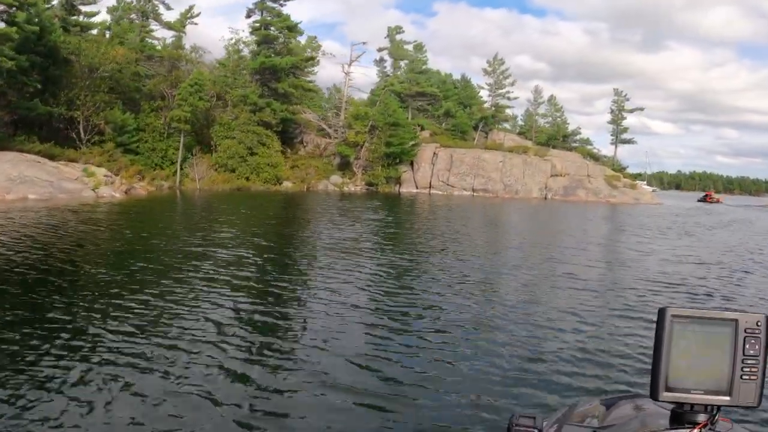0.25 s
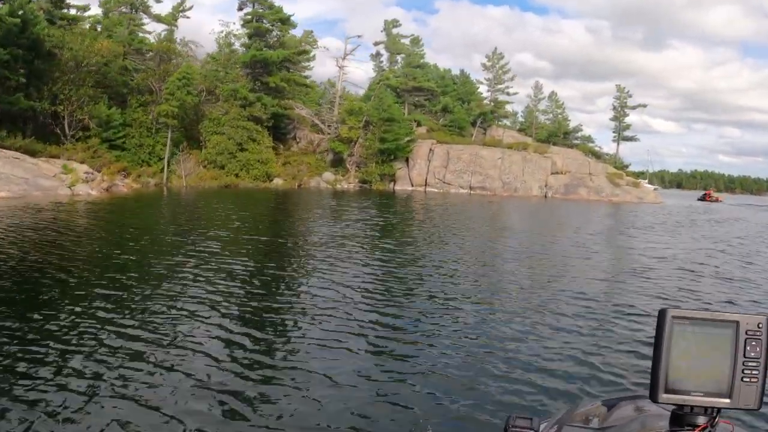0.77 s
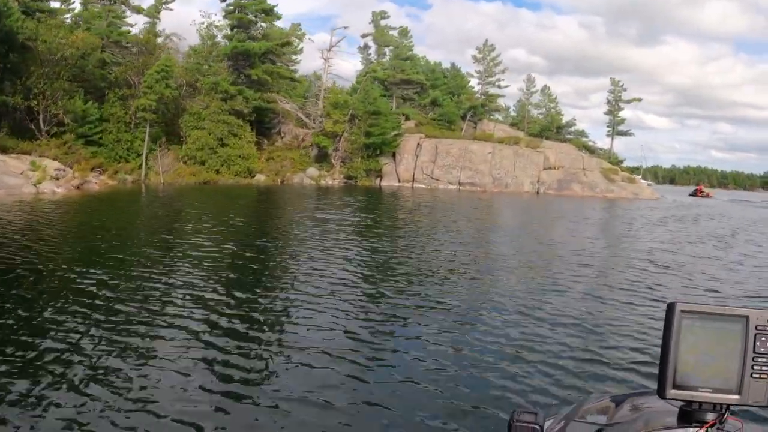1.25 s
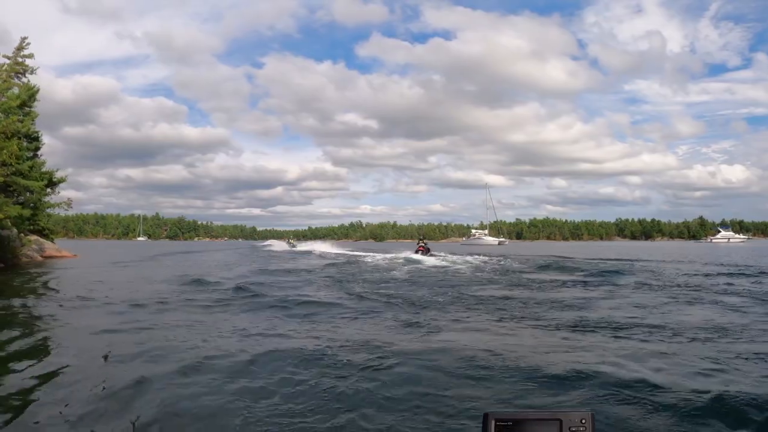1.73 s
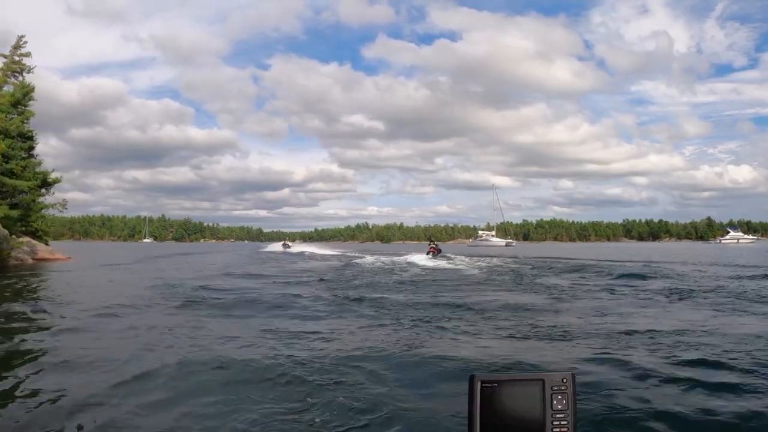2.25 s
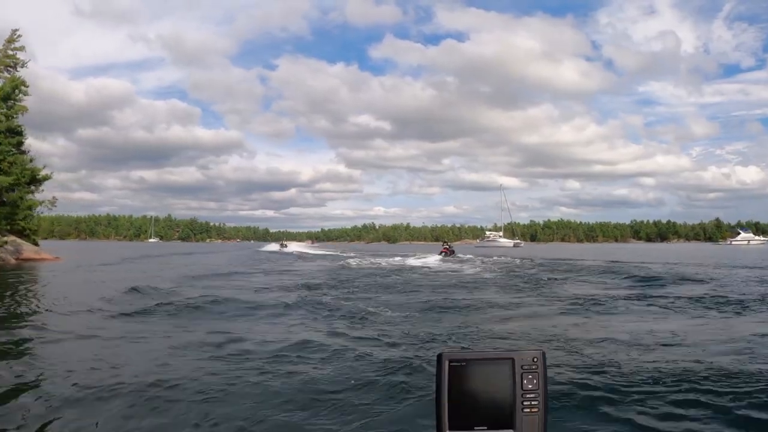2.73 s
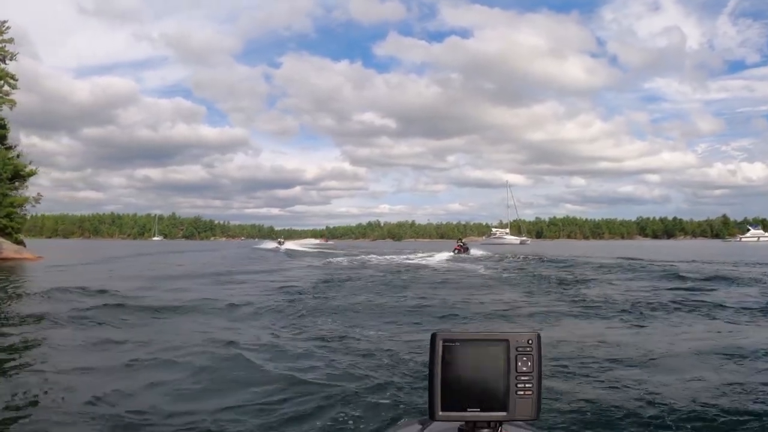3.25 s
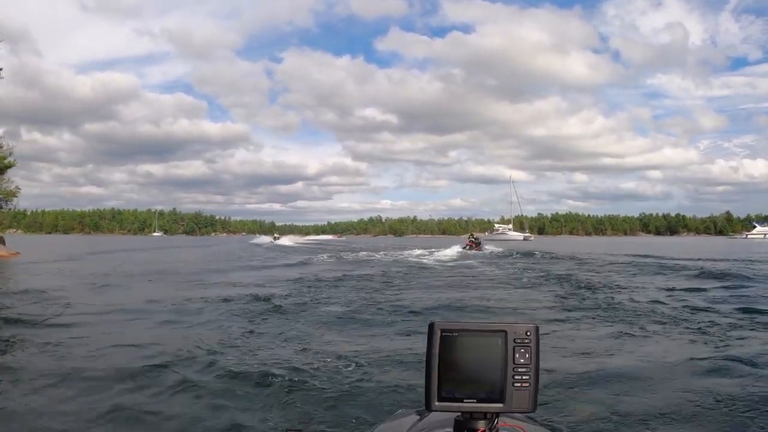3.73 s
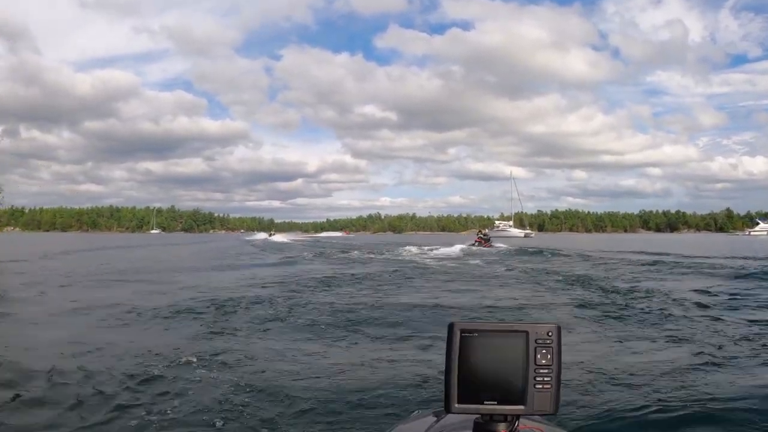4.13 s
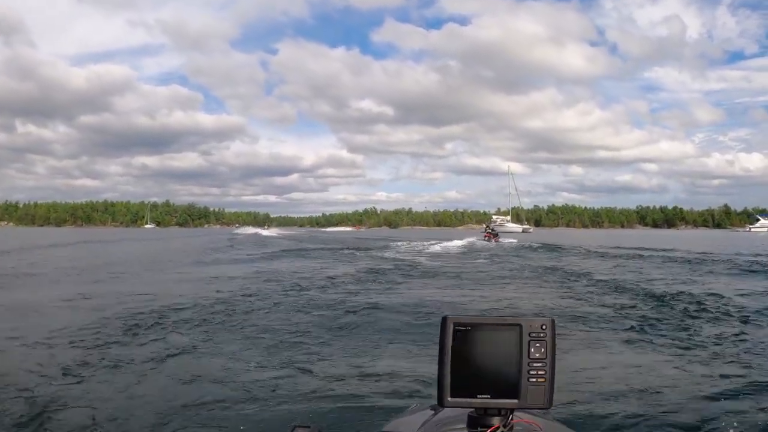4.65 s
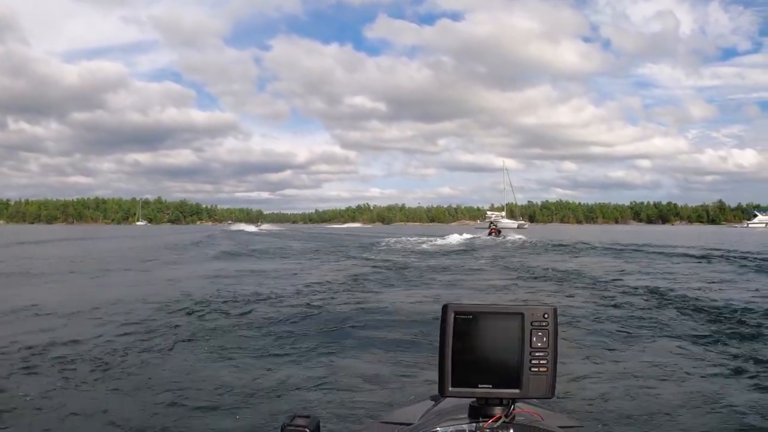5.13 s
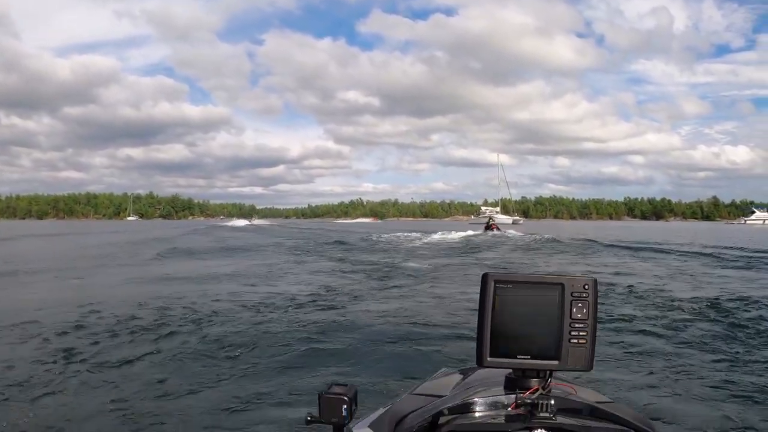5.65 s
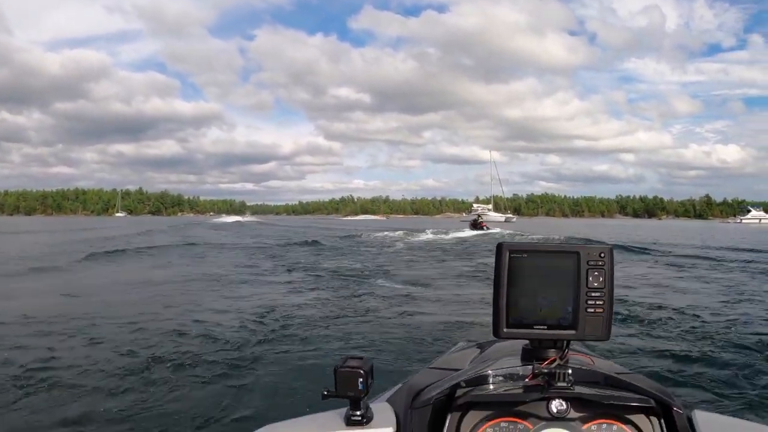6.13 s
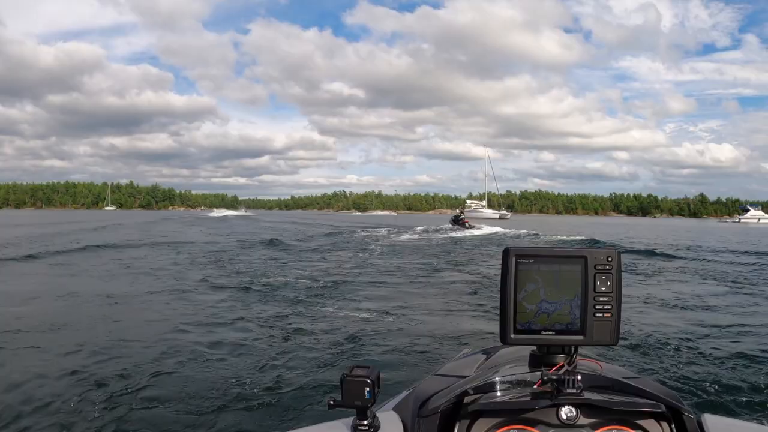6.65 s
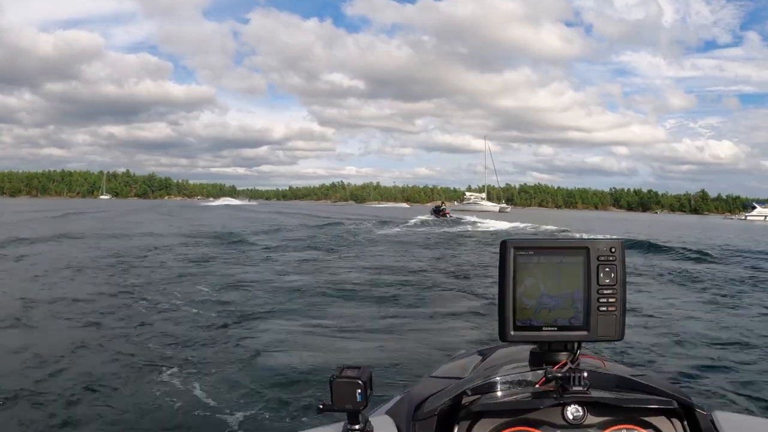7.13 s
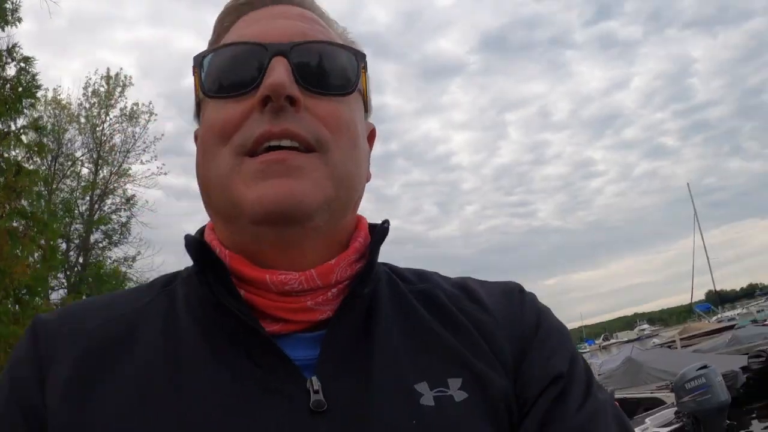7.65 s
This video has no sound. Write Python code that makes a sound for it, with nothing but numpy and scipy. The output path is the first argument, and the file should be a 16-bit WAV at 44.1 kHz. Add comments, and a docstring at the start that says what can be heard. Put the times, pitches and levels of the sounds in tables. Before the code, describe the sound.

An onboard microphone catches a watercraft's low idle hum, sharply replaced by the ride. The motor revs up, sags slightly through choppy swells, then climbs to a cleaner, higher drone as the hull planes. Bubbling exhaust, rushing wash, knocks and wet sheets of spray surround it, with a second craft's drone in front. Finally everything cuts to a deep gusty outdoor rumble and one short falling chirp.

```python
"""A personal watercraft heard from the seat: its three-cylinder engine idles, then pulls away and climbs onto the plane.
The engine is a stack of tones locked to its turning; a second craft drones ahead as one such tone.
Exhaust burble, wash, spray and foam are noise given a spectrum, with ringing bubbles in the spray and foam.
Two abrupt scene changes part the idle, the ride and a gusty rumble that fades in with one short chirp."""
import sys
import numpy as np
from scipy import signal
from scipy.fft import rfft, irfft
from scipy.io import wavfile

SR = 44100
rng = np.random.default_rng(int(sys.argv[2]) if len(sys.argv) > 2 else 0)


def dump_mix(stems):
    """Bounce the given channels to the path in sys.argv[1] as a 16-bit WAV at rate SR."""
    frames = np.atleast_2d(stems).T  # one column per channel
    limited = np.clip(frames, -1, 1)  # hard clip at full scale
    pcm = np.round(limited * 32767).astype(np.int16)
    wavfile.write(sys.argv[1], SR, pcm)


N = 347949
TIME = np.arange(N) / SR  # seconds
FIRST_CUT_S, SECOND_CUT_S = 1.371, 7.49  # the idle ends; the ride ends

# Water rushing along the hull, which also feeds the steady spray.
# Each row: time in seconds, level in dB before the wash's own small boost.
WASH_LEVEL = [(1.45, -53), (1.6, -50.5), (1.95, -46), (2.25, -44.5), (2.7, -45), (3.0, -42), (3.45, -39.5),
              (4.0, -39.5), (4.6, -40), (5.5, -40.5), (5.75, -42), (6.02, -47.5), (6.35, -52), (6.8, -52.5),
              (7.05, -52.5), (7.3, -46), (7.47, -46.5)]


def amp(db):
    """Turns decibels into a gain."""
    return 10 ** (np.asarray(db) / 20)


def unit(x):
    """Scales a sound to an rms of 1."""
    return x / np.sqrt(np.mean(x ** 2) + 1e-20)


def curve(rows):
    """Draws straight lines between the (time, value) rows, giving a value at every sample."""
    return np.interp(TIME, *np.transpose(rows))


def read(points, hz):
    """Reads a (frequency, value) table along a logarithmic frequency axis."""
    table_hz, value = np.transpose(points)
    return np.interp(np.log(hz + 1), np.log(table_hz), value)


def ramp(start, length):
    """Rises in a straight line from 0 to 1; both settings are in seconds."""
    return np.clip((TIME - start) / length, 0, 1)


def wander(hz):
    """Slow random drift of rms 1, with little movement faster than hz."""
    knots = np.arange(0, N / SR + 1, 1 / 400)
    spectrum = rfft(rng.standard_normal(len(knots)))
    spectrum /= 1 + (np.fft.rfftfreq(len(knots), knots[1]) / hz) ** 4
    return np.interp(TIME, knots, unit(irfft(spectrum, len(knots))))


def pan(db):
    """Gains of the two channels, left louder than right by db."""
    return amp([[db / 2], [-db / 2]])


def ring(drive, hz, width):
    """A fixed resonance, applied twice so that it falls away steeply; rms 1."""
    b, a = signal.iirpeak(hz, hz / width, fs=SR)
    once = signal.lfilter(b, a, drive)
    return unit(signal.lfilter(b, a, once))


def hiss():
    """Two unrelated white noises."""
    return rng.standard_normal((2, N))


def patter(per_s, spread_db):
    """Sparse random clicks of very unequal size, like many tiny impacts."""
    size = amp(spread_db * np.minimum(rng.exponential(1, (2, N)), 4))
    return unit(size * np.sign(hiss()) * (rng.random((2, N)) < per_s / SR))


def colour(drive, tone, patchy_db, size=1024):
    """Gives noise a spectrum and drifting patches, and spreads it over left and right."""
    # Each row: frequency in Hz, likeness of the two channels from 0 to 1.
    likeness = [(60, .995), (280, .98), (500, .9), (900, .65), (1600, .72), (2000, .87), (2600, .88),
                (4000, .55), (7500, .2)]
    # Each row: frequency in Hz, left minus right in dB.
    balance = [(60, .4), (300, 1.7), (1600, 4.4), (2100, 3.6), (2600, 4.5), (3000, 8), (5400, -1),
               (7300, 7), (8500, 1), (13000, -4)]
    # Each row: frequency in Hz, phase by which left leads in radians.
    left_lead = [(400, -.1), (900, -.55), (1600, -.65), (1850, -1.45), (2650, -1.45), (2900, -.8),
                 (10500, 2.5)]
    hz, _, (first, second) = signal.stft(drive, SR, nperseg=size)
    hz = hz[:, None]
    same = np.clip(read(likeness, hz), 0, 1)
    left = first * np.exp(1j * read(left_lead, hz))
    right = same * first + np.sqrt(1 - same ** 2) * second
    blur = np.outer(np.hanning(13), np.hanning(9))  # across frequency and time
    patches = unit(signal.fftconvolve(rng.standard_normal(first.shape), blur, "same"))
    side = amp(read(balance, hz) / 2)
    shaped = np.array([left * side, right / side]) * amp(read(tone, hz) + patchy_db * patches)
    out = signal.istft(shaped, SR, nperseg=size)[1][:, :N]
    return out / np.std(out.mean(0))


def order(turns, k, rough):
    """One engine order, a tone k times per engine cycle; uneven combustion shakes its size and phase."""
    size = 1 + rough * wander(12.0)
    sway = rough * wander(13.0)
    return np.sqrt(2) * size * np.cos(2 * np.pi * (k * turns + rng.random()) + sway)


def throb(turns, depth):
    """Swells at each of three firings per engine cycle, with one cylinder a little stronger."""
    firings = np.cos(2 * np.pi * 3 * turns)
    strong_one = .5 * np.cos(2 * np.pi * turns)
    return unit(np.exp(depth * (firings + strong_one)))


def bubbles(per_s, low_hz, high_hz, cycles, spread_db):
    """Small bubbles ring briefly, each at its own pitch and place, rising as they surface."""
    when, pitch, size, place = rng.random((int(per_s * N / SR), 4)).T[:, :, None]
    hz = low_hz * (high_hz / low_hz) ** pitch
    age = hz * np.arange(512) / SR / cycles  # 1 when the ring has died to about a third
    level = amp(-spread_db * np.log(size + 0.0084))
    ping = level * np.exp(-age) * np.sin(2 * np.pi * cycles * age * (1 + 0.01 * age))
    at = ((when * N).astype(int) + np.arange(512)).ravel()
    shares = np.sqrt(place), 0.46 * np.sqrt(1 - place)  # left and right
    return unit(np.array([np.bincount(at, (ping * share).ravel(), N)[:N] for share in shares]))


def gust():
    """A buffeting rumble with a brief falling chirp over it, the same in both ears."""
    # Each row: time in seconds, level of the rumble in dB.
    rumble_level = [(7.64, -76), (7.665, -43.5), (7.7, -30.5), (7.745, -25), (7.89, -26)]
    # Each row: frequency in Hz, relative strength in dB per Hz.
    rumble_tone = [(22, -21), (45, -4), (65, -4.5), (90, 1), (130, -2.5), (210, -7), (280, -22), (750, -21),
                   (1150, -20), (1800, -30.2), (2600, -40.5), (5500, -48), (11000, -71.5)]
    buffeted = hiss() * amp(1.1 * wander(37))
    rumble = amp(curve(rumble_level)) * colour(buffeted, rumble_tone, patchy_db=1.3, size=2048).mean(0)
    pitch = curve([(7.86, 4600), (7.885, 4370)])
    bump = np.exp(-((TIME - 7.872) / 0.008) ** 2)
    chirp = amp(-40.0) * bump * np.sin(2 * np.pi * np.cumsum(pitch) / SR)
    return (rumble + chirp) * ramp(7.64, 0.022)


def tick():
    """Faint dry ticks around the end of the ride, each a tone under a very short bump."""
    # Each row: time in seconds, peak in dB, pitch in Hz.
    tick_rows = [(7.4877, -29.5, 2500), (7.521, -40, 4524)]
    return sum(amp(db) * np.exp(-((TIME - s) / .0001) ** 2) * np.cos(2 * np.pi * hz * (TIME - s))
               for s, db, hz in tick_rows)


def craft_ahead():
    """The drone of another craft running ahead, one tone that beats against the near engine."""
    # Each row: time in seconds, base pitch in Hz (the drone sounds at 0.98 of it), level in dB.
    craft_rows = [(1.42, 120, -46), (1.6, 121.1, -37), (2.15, 123.2, -39), (2.8, 127, -42),
                  (3.55, 130.5, -40), (4.5, 131, -43), (5.5, 131.6, -45), (6.0, 132, -65)]
    pitch, level = (curve(np.array(craft_rows)[:, [0, k]]) for k in (1, 2))
    return amp(level) * order(np.cumsum(pitch) / SR, 0.98, rough=0.17) * pan(1.4)


def side_fizz():
    """Foam fizzes and pops along the left side until the craft gathers way."""
    # Each row: time in seconds, level of the foam in dB before its fizz and pops are mixed.
    foam_level = [(1.4, -46), (1.47, -62), (1.51, -52.5), (1.75, -49.5), (1.83, -50.5), (1.95, -51.5),
                  (2.08, -48.5), (2.22, -49.5), (2.38, -54.5), (2.7, -54.5), (2.95, -59), (3.2, -90)]
    # Each row: frequency in Hz, relative strength in dB per Hz.
    foam_tone = [(1500, -1), (2000, 11), (2400, 1.5), (2750, 0), (3250, -7.5), (3700, -8), (5000, 3),
                 (5550, -6.5), (7250, -4.5), (8100, -18), (9500, -26.5), (10150, -15), (11000, -34.5),
                 (14000, -40)]
    drive = hiss() + 0.56 * patter(1500, spread_db=3.0)
    fizz = colour(drive, foam_tone, patchy_db=4.0, size=512)
    pops = bubbles(per_s=350, low_hz=1740, high_hz=7000, cycles=18, spread_db=4.0)
    return amp(curve(foam_level)) * (amp(-2.5) * fizz + amp(-8) * pops) * pan(5.5)


def drops():
    """Each near drop or slap on the hull is a short noise burst in the resonance of its bubbles."""
    # Each row: start in seconds, level in dB, pitch in Hz, decay in seconds.
    drop_rows = [(.848, -48, 3970, 0.004), (1.203, -50, 10200, 0.0015), (1.511, -45, 5770, 0.0053),
                 (1.7, -53, 4900, 0.05), (1.796, -41, 1210, 0.0083), (1.83, -47, 2130, 0.025),
                 (2.232, -45, 4252, 0.0029), (2.66, -47, 2800, 0.035), (2.71, -45.5, 2860, 0.045),
                 (2.764, -41, 2670, 0.023), (2.785, -38.5, 3900, 0.0028), (2.825, -41, 7000, 0.0011),
                 (2.891, -29, 3500, 0.0014), (3.507, -23, 3500, 0.00099), (3.616, -18, 1880, 0.00091),
                 (3.852, -30.5, 1110, 0.0057), (4.003, -28, 1000, 0.015), (4.16, -38, 1070, 0.013),
                 (4.663, -44, 7000, 0.037), (4.907, -28, 2398, 0.0021), (5.46, -38.5, 930, 0.03)]
    out, t = np.zeros(N), np.arange(4096) / SR
    for s, db, hz, decay in drop_rows:
        # the first half is dropped, so that the resonance is already ringing
        burst = ring(rng.standard_normal(2 * len(t)), hz, width=0.29 * hz)[len(t):]
        envelope = np.exp(-t / decay) * (1 - np.exp(-t / 0.00012))
        out[round(s * SR):][:len(t)] += amp(db) * burst * envelope
    return out * pan(3.2)


def spray_level():
    """Steady spray grows with the wash; each slap adds a sheet that rises, holds and falls back."""
    # Chop slapping the bow. Each row: start in seconds, hold in seconds, level in dB.
    splash_rows = [(2.856, 0.29, -46.5), (3.007, 0.19, -38), (3.24, 0.1, -38), (3.365, 0.14, -34.5),
                   (3.57, 0.093, -35), (3.72, 0.2, -40), (3.92, 0.21, -35), (4.262, 0.061, -37),
                   (4.398, 0.031, -41.5), (4.631, 0.017, -37), (4.873, 0.04, -35.5), (4.94, 0.036, -31),
                   (5.046, 0.11, -34), (5.23, 0.09, -39.5), (5.444, 0.012, -40), (5.6, 0.018, -41.5)]
    # The spray thins over a trough. Each row: middle in seconds, half length in seconds, change in dB.
    lull_rows = [(4.558, 0.066, -4), (4.778, 0.09, -0.5)]
    steady_db, at_wash_db, per_wash = -42.5, -42, 1.155  # level at that wash level, dB per dB of wash
    attack_s, fall_s = 0.028, 0.045
    # quieter by 14 dB until the craft has gathered way
    early_db = -14 * (1 - ramp(2.615, 0.29))
    power = amp(steady_db + early_db + per_wash * (curve(WASH_LEVEL) - at_wash_db)) ** 2
    for s, hold, db in splash_rows:
        falling = np.maximum(TIME - s - attack_s - hold, 0)
        power = power + (amp(db) * ramp(s, attack_s) * np.exp(-falling / fall_s)) ** 2
    lull_db = sum(db * np.exp(-((TIME - s) / half) ** 2) for s, half, db in lull_rows)
    return np.sqrt(power) * amp(lull_db)


def spray(planing):
    """Bow sheets fall back as drops that trap bubbles; on the plane they thin to an even, brightening hiss."""
    # In all three, each row: frequency in Hz, relative strength in dB per Hz.
    sheet_tone = [(600, -17), (1400, -5), (2000, 3.5), (3000, 0.5), (4700, -4.5), (6200, -11.5),
                  (7500, -14), (8400, -16.5), (10200, -20.5), (11200, -32.5), (12500, -28), (14000, -51)]
    mist_tone = [(500, -9.5), (1000, 0.5), (2800, -2), (4300, -7.5), (6200, -15), (9500, -24),
                 (14000, -47.5)]
    fine_tone = [(2000, -11), (5000, 4), (9500, -7), (14000, -23)]
    mist_patchy_db = .9
    drive = (hiss() + patter(1800, spread_db=1.0)) * amp(0.9 * wander(54))
    sheets = colour(drive, sheet_tone, patchy_db=1.6, size=512)
    pings = bubbles(per_s=370, low_hz=1838, high_hz=5010, cycles=16, spread_db=3.6)
    mist = colour(hiss(), mist_tone, patchy_db=mist_patchy_db)
    # fine spray, torn off the bow as the craft nears full speed
    fine = amp(-54.48) * ramp(6.55, 1) ** 2 * colour(hiss(), fine_tone, patchy_db=mist_patchy_db)
    splashing = amp(-0.14) * sheets + amp(-9.5) * pings
    return spray_level() * (np.sqrt(1 - planing) * splashing + np.sqrt(planing) * mist) + fine


def swell():
    """How deep the hull sits in the long swells it pushes through, from 0 to about 1."""
    # Each row: middle in seconds, half length in seconds, depth from 0 to 1.
    swell_rows = [(3.572, 0.31, 0.8), (5.084, 0.21, 0.8)]
    return sum(depth * np.exp(-((TIME - s) / half) ** 2) for s, half, depth in swell_rows)


def water(turns):
    """Exhaust bubbling behind the stern, and the wash along the hull: noise throbbing with the engine."""
    # The burble drops once the stern lifts. Each row: time in seconds, level in dB outside the swells.
    burble_level = [(1.42, -48), (1.55, -44.5), (1.78, -41.5), (1.95, -35.5), (2.2, -36), (2.4, -38.5),
                    (2.7, -39), (5.0, -37.5), (5.75, -37), (6.2, -47.5), (7.05, -47.5), (7.48, -40)]
    # In both, each row: frequency in Hz, relative strength in dB per Hz.
    burble_tone = [(40, -45), (62, -16), (85, -2.5), (130, -1), (210, 5.5), (280, 3.5), (400, -1),
                   (600, -13.5), (1200, -70)]
    wash_tone = [(200, -19.5), (430, 1), (800, -1), (1100, -1), (1600, -8), (3000, -14.5), (6000, -42.5),
                 (13000, -52.5)]
    smother_db, wash_boost_db = -1.5, 0.58  # a swell smothers the exhaust
    burble = colour(hiss() * throb(turns, depth=0.22), burble_tone, patchy_db=0.86, size=2048)
    wash = colour(hiss() * throb(turns, depth=0.06), wash_tone, patchy_db=1.0)
    burble = amp(curve(burble_level) + smother_db * swell()) * burble
    return burble + amp(curve(WASH_LEVEL) + wash_boost_db) * wash


def idle():
    """The lumpy idle: a hum of engine orders, with the exhaust puffing at the waterline as throbbing noise."""
    # Each row: order (times per engine cycle), relative level in dB.
    idle_orders = [(4, -9), (6, 3), (8, -1.5), (9, -5), (10, -3), (12, 1), (13, -5.5), (15, -12), (18, -9),
                   (20, -10.5)]
    # Each row: frequency in Hz, relative strength in dB per Hz.
    puff_tone = [(29, -49), (50, -25), (109, -5), (148, -9.5), (237, -4), (260, -10.5), (293, -6.5),
                 (398, -11), (580, -17), (1840, -21.5), (3910, -30.5), (6720, -44), (10300, -53),
                 (14000, -68)]
    cycles_per_s = 19.65 * (1 + 0.0034 * wander(3.1))
    turns = np.cumsum(cycles_per_s) / SR
    hum = unit(sum(amp(db) * order(turns, k, rough=0.23) for k, db in idle_orders))
    puffs = colour(hiss() * throb(turns, depth=0.13), puff_tone, patchy_db=0.55, size=2048)
    return amp(-43.5) * hum * pan(1.2) + amp(-44.0) * puffs


def hull(hz):
    """Gain of the hull and exhaust resonances that the firing orders sweep through, for a tone at hz."""
    # Each row: centre in Hz, width in Hz, peak gain in dB.
    mode_rows = [(86, 12, -42), (109.7, 29.5, -36), (122.4, 20, -41.5), (149.7, 10, -38.5),
                 (163.9, 9, -40.5), (180.4, 10, -39.5), (195, 27, -36.5), (243.5, 11.4, -39),
                 (260.3, 22.3, -33.5), (275, 37, -38), (308.3, 45, -34), (352.9, 23, -37.5), (731, 35, -54)]
    return np.sqrt(sum((amp(db) / (1 + (2 * (hz - centre) / width) ** 2)) ** 2
                       for centre, width, db in mode_rows))


def engine(speed, turns, planing):
    """Orders through the hull: dull until the throttle opens, rough with a drowned exhaust, clean on the plane."""
    # Each row: order, level in dB, then dB gained with the throttle shut, in a swell and on the plane,
    # and dB per dB of load on the plane.
    firing_orders = [(3, 0, -7, 2, -0.5, 0.93), (6, 3, 0, -9, -2, 0.13), (9, 1, -2.5, 3.5, -5, 0.2),
                     (12, -2.5, -15, 1, 4, 2.5), (18, -5, -4, 1.5, 3.5, 1.5)]
    # Weaker orders, from unequal cylinders and the pump.
    # Each row: order, dB while ploughing, dB on the plane, both before the load is added.
    weak_orders = [(2, -67.5, -55), (4, -48, -42.5), (5, -42.5, -58), (7, -46, -57.5), (8, -46.5, -50.5),
                   (10, -51.5, -56), (11, -52.5, -61.5), (14, -62, -59), (15, -66, -58.5), (20, -52, -77)]
    # The pump's load, which swells the weak orders. Each row: time in seconds, load in dB.
    load_rows = [(1.4, -21), (1.8, -7), (1.9, -1.5), (2.1, -3), (2.6, -5.5), (3.4, 1), (4.5, -3), (5.5, 4),
                 (6.4, -2.5), (7.08, -1), (7.2, 5), (7.35, 5.5)]
    # The ninth order's level rises and falls unevenly through the ride.
    # Each row: time in seconds, extra level in dB.
    ninth_rows = [(1.95, -7.5), (2.03, 6), (2.12, -1.5), (2.18, 8), (2.29, -0.5), (2.6, -0.5), (2.71, -10),
                  (2.78, 2.5), (2.83, -10), (2.97, 1), (3.05, -7.5), (3.15, 2.5), (3.3, -1.5), (3.5, 3),
                  (4.2, -3), (4.43, -10), (4.62, 1), (4.72, -2.5), (4.9, -1), (5.03, 3), (5.12, -0.5),
                  (5.25, 5.5), (5.45, -2), (5.8, -0.5), (6.3, -11), (7.2, -0.5)]
    rough = .14 * (1 - planing) + .055 * planing
    shut = 1 - ramp(2.12, 0.2)
    deep, load = swell(), curve(load_rows)
    firing = 0
    for k, db, shut_db, swell_db, plane_db, per_load in firing_orders:
        level_db = db + shut_db * shut + swell_db * deep + (plane_db + per_load * load) * planing
        if k == 9:
            level_db = level_db + curve(ninth_rows)
        firing = firing + hull(k * speed) * amp(level_db) * order(turns, k, .9 * rough)
    weak = sum(amp(low + (high - low) * np.sqrt(planing)) * order(turns, k, 1.9 * rough)
               for k, low, high in weak_orders)
    return (firing * ramp(FIRST_CUT_S, 0.22) ** 2 + amp(load) * weak) * pan(1.7)


def scene():
    """Three scenes in turn: the idle and the ride stop abruptly, the ride and the gust fade in."""
    # Each row: time in seconds, engine cycles per second.
    speed_rows = [(1.42, 22.6), (1.82, 22.9), (1.96, 25.0), (2.0, 27.2), (2.1, 29.8), (2.18, 30.3),
                  (2.4, 30.05), (2.76, 30.45), (3.0, 29.4), (3.73, 29.4), (4.21, 27.15), (4.66, 27.0),
                  (5.05, 28.25), (5.2, 29.85), (5.44, 32.95), (5.76, 36.1), (6.25, 39.6), (6.38, 40.2),
                  (6.72, 40.7), (6.92, 41.5), (7.48, 42.35)]
    speed = curve(speed_rows)
    planing = ramp(5.144, 0.95)  # the hull climbs out of the water
    turns = np.cumsum(speed) / SR
    ride = engine(speed, turns, planing) + craft_ahead() + water(turns) + side_fizz() + spray(planing)
    ride = ride * pan(2.2) ** (1 - ramp(2.1, 0.98))  # the sound leans left while the craft pulls away
    ride *= ramp(FIRST_CUT_S, 0.093) ** 1.3 * (TIME < SECOND_CUT_S)
    return idle() * (TIME < FIRST_CUT_S) + ride + drops() + tick() + gust()


def record(dry):
    """Takes away the treble above about 14.1 kHz."""
    low_pass = signal.firwin(255, 14100, window=("kaiser", 9), fs=SR)
    return signal.oaconvolve(dry, low_pass[None], "same")


dry = scene()
out = record(dry)
dump_mix(out)
```